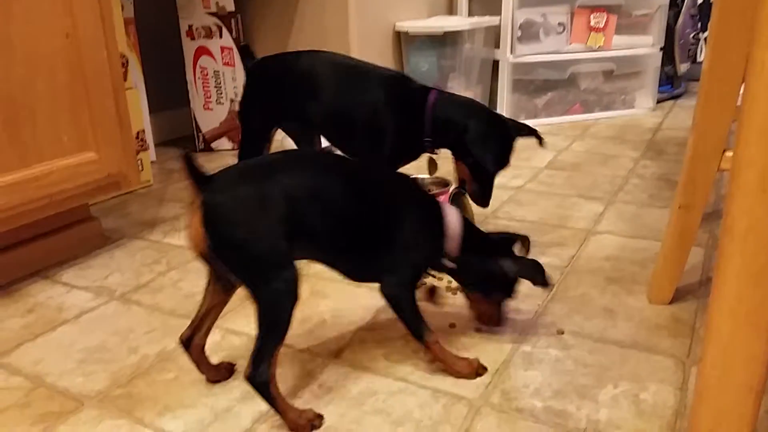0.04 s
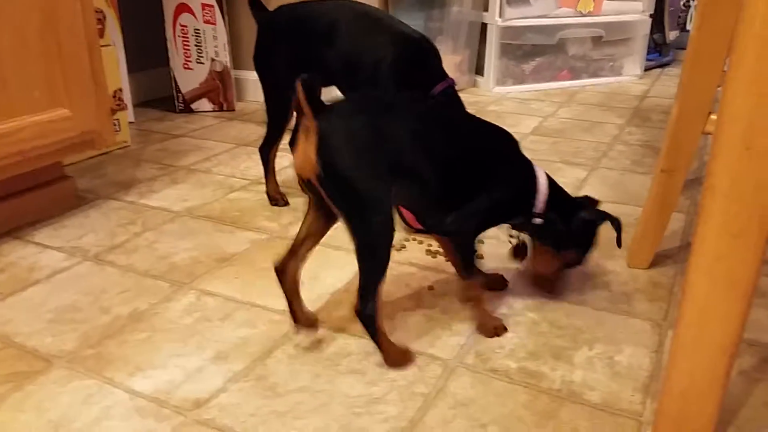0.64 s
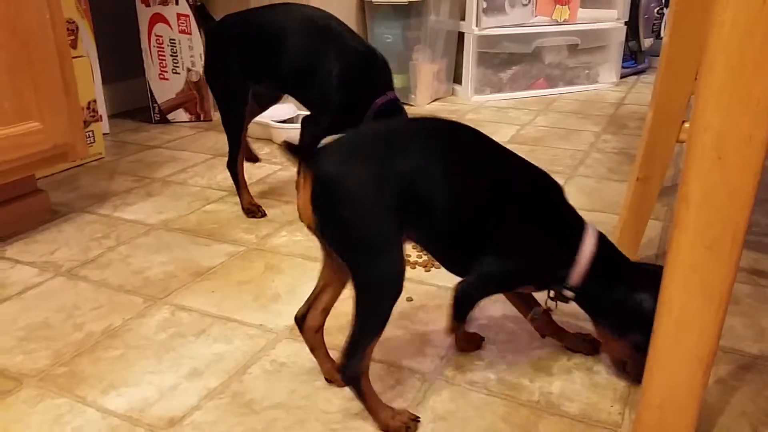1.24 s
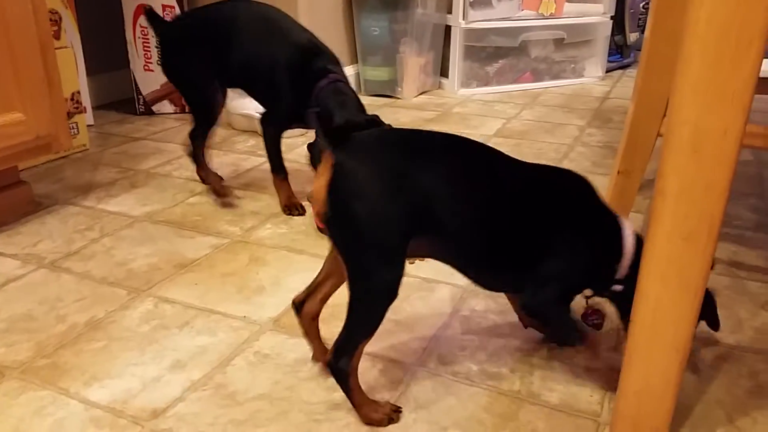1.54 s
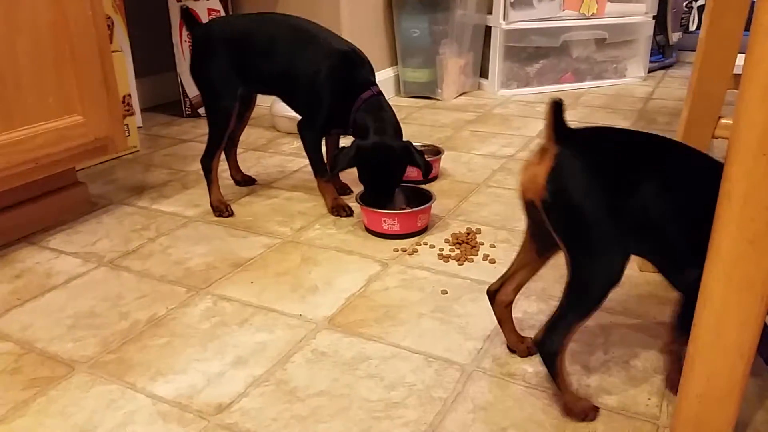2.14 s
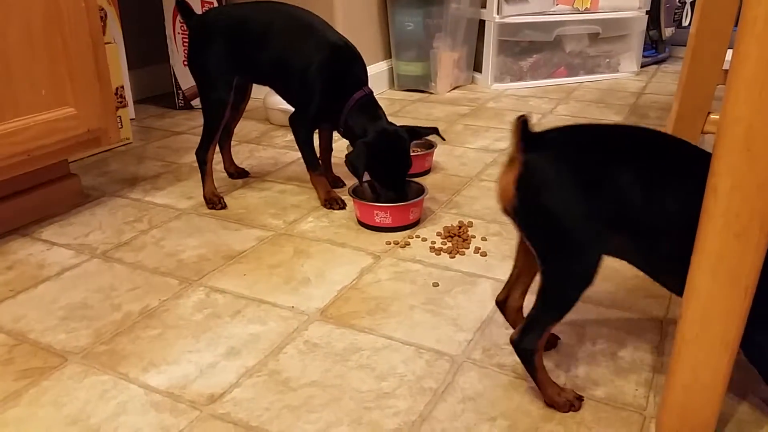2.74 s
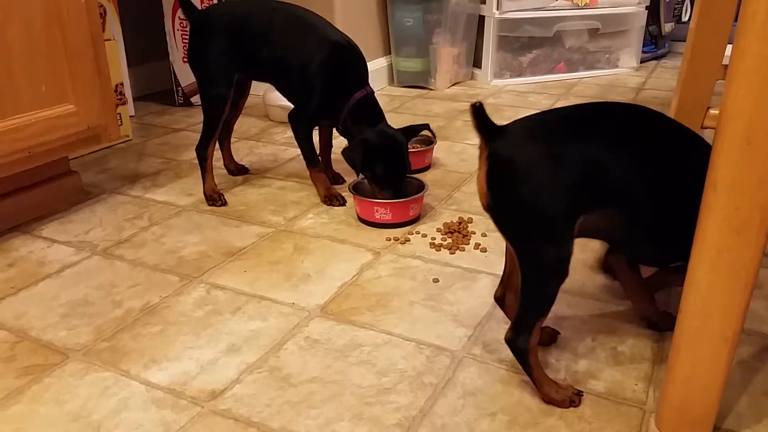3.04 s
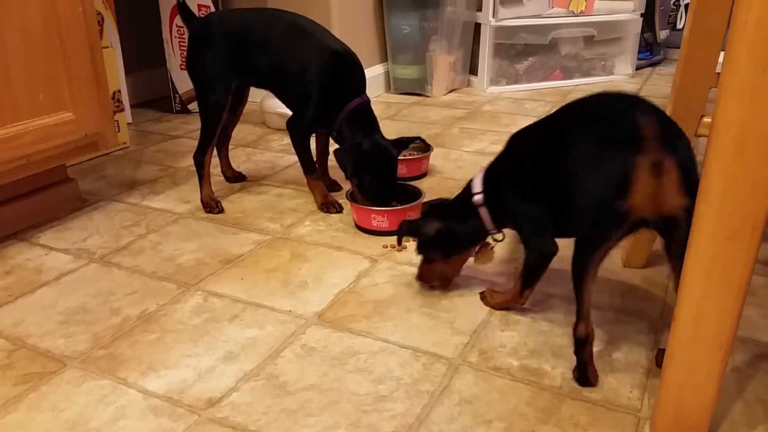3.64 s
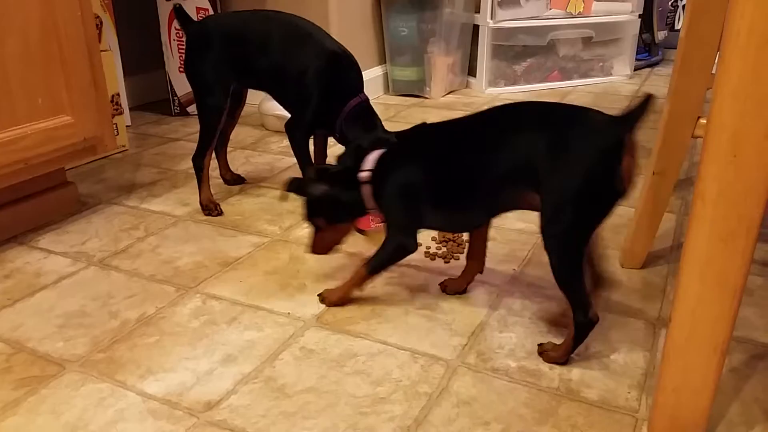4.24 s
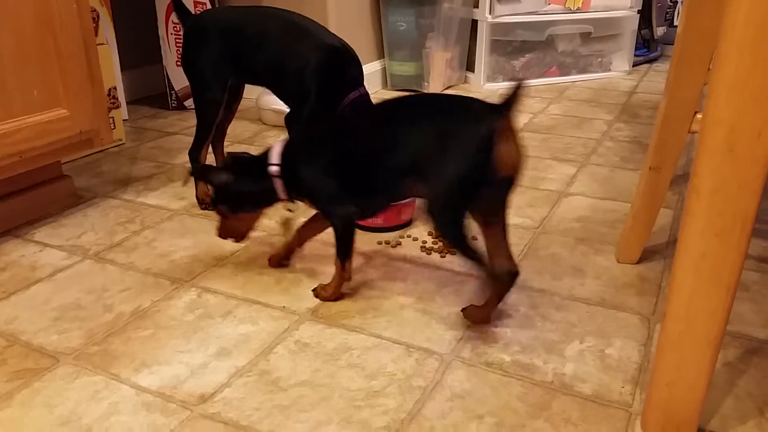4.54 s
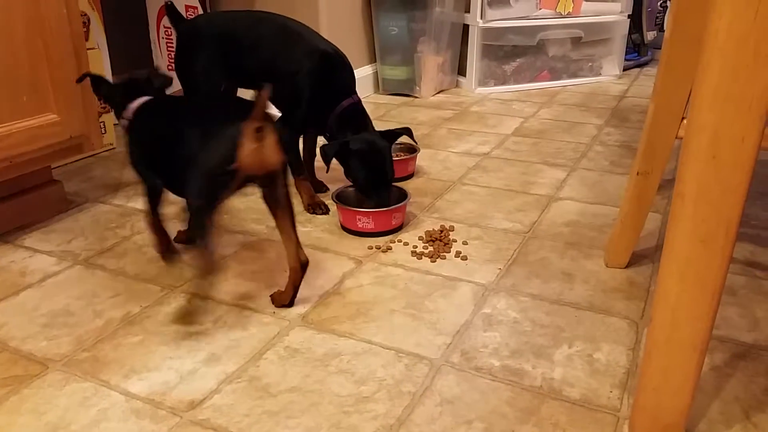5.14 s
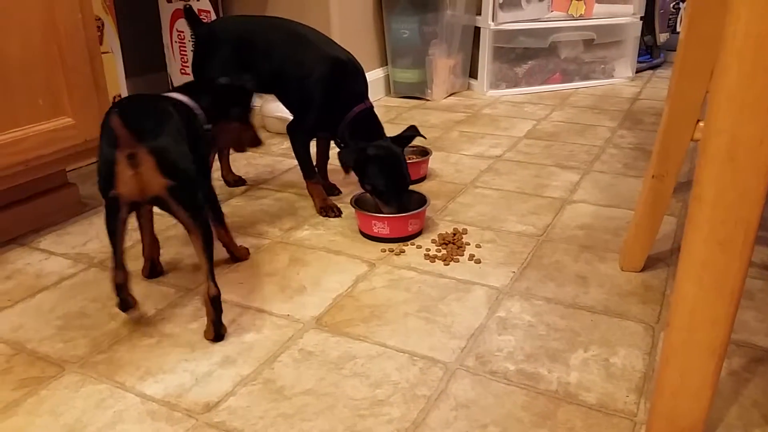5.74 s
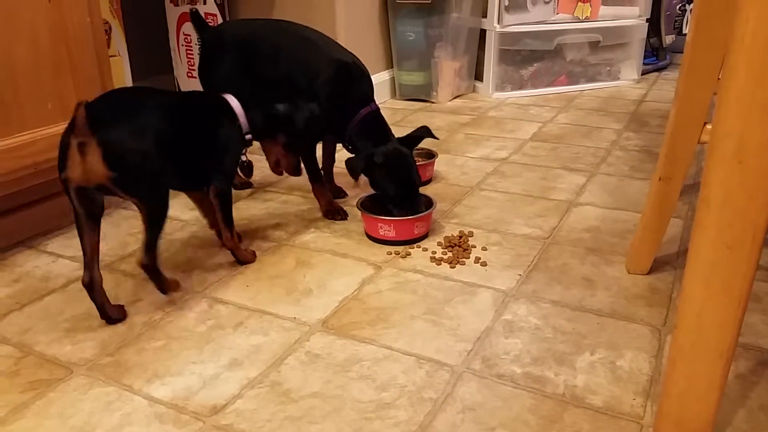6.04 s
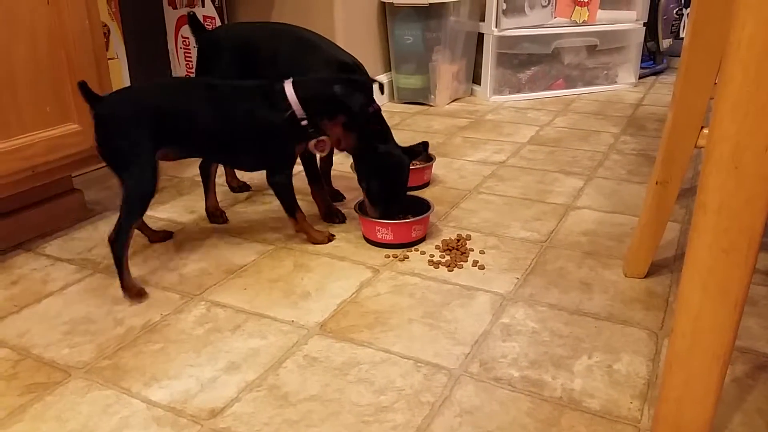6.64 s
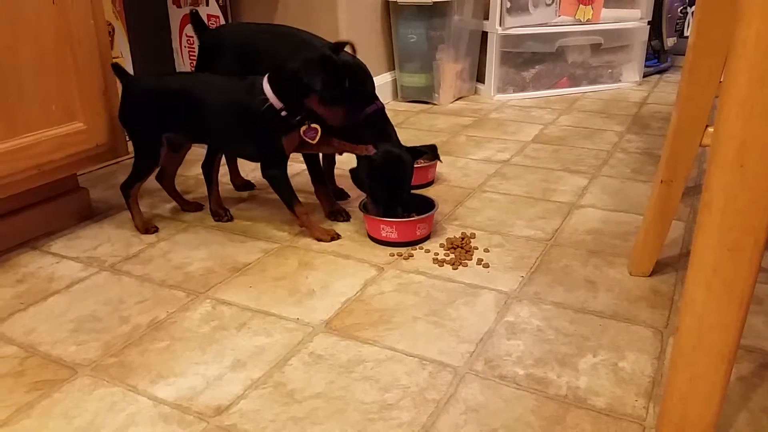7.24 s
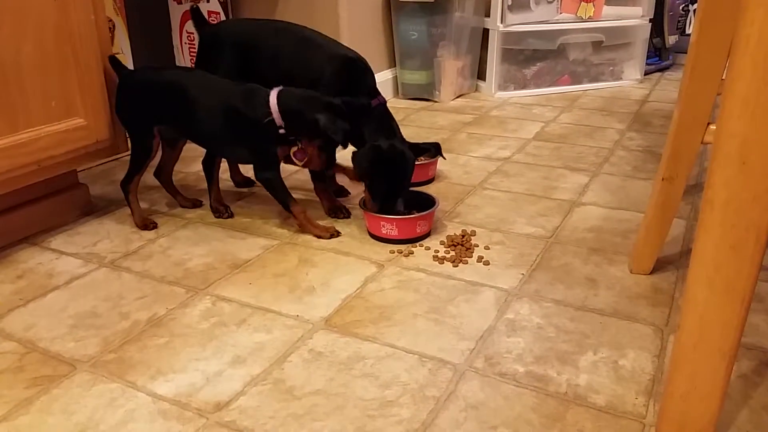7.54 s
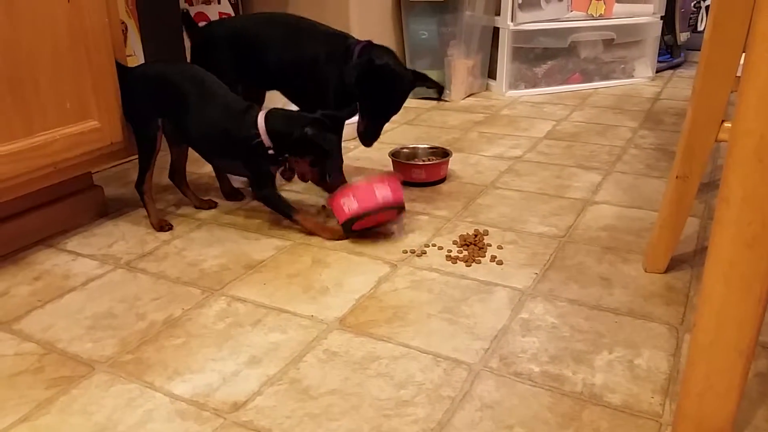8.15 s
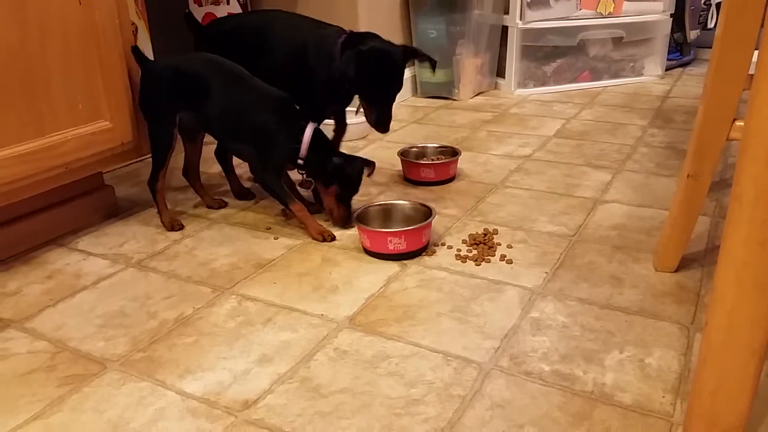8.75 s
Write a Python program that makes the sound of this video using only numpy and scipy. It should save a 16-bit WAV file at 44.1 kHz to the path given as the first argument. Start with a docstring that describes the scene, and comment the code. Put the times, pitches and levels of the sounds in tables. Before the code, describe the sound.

Two dogs crunch kibble with tapping claws and clinking collar tags, then a steel bowl tips and clatters on a kitchen floor.

```python
"""Two dogs eat from steel bowls on a hard kitchen floor while an appliance hums.
From the start kibble cracks between teeth, claws tap, collar tags clink and paws thump.
Near 1.5 s a bowl is knocked and its kibble rattles. From 3 to 7 s jaws crush crumbs,
muzzles rummage and tongues tick. At 8 s a bowl is tipped up and rocks back down:
its base bumps the floor and the kibble surges against the ringing steel."""
import sys
import numpy as np
from scipy import signal
from scipy.fft import rfft, irfft, next_fast_len
from scipy.io import wavfile

SR = 44100
rng = np.random.default_rng(int(sys.argv[2]) if len(sys.argv) > 2 else 0)


def persist_wave(psi):
    """Save psi, clipped to +-1, as 16-bit WAV."""
    counts = np.round(np.clip(psi, -1, 1) * 32767).astype(np.int16)
    wavfile.write(sys.argv[1], SR, np.atleast_2d(counts).T)


N = 396900
FEEDING_FROM_S, FEEDING_TO_S = 3.0, 6.95

# Spectra of a crack: bright snap, hollow body, hard edge. Each row: frequency in Hz, relative dB.
SNAP_SPECTRUM = [(5000, -10), (6500, -11.5), (8000, -15), (10000, 2.5), (11300, 7), (13000, -3),
                 (16000, -17.5)]
BODY_SPECTRUM = [(300, -23.5), (620, 7.5), (850, -7), (1120, 5.5), (1600, -11.5), (2400, -14.5),
                 (4000, -59)]
EDGE_SPECTRUM = [(1500, 9), (2500, -37.5), (3400, 3.5), (4300, 1), (5800, 8.5), (7500, -22.5)]


def from_db(db):
    """Decibels to gain."""
    return 10 ** (np.asarray(db) / 20)


def decay(t, t60_s):
    """Exponential envelope, 60 dB down at t60_s."""
    return from_db(-60 * t / t60_s)


def unit_rms(x):
    """Scale to rms 1."""
    return x / np.sqrt(np.mean(x ** 2) + 1e-20)


def at_hz(points, hz):
    """Interpolate a table on a log-frequency axis."""
    freqs, values = np.transpose(points)
    return np.interp(np.log(np.maximum(hz, 1)), np.log(freqs), values)


def seconds(length_s):
    """Time axis of a short sound."""
    return np.arange(int(length_s * SR)) / SR


def add(out, start_s, sound):
    """Mix a sound in at start_s."""
    start = int(np.clip(round(start_s * SR), 0, N - 1))
    out[start:start + len(sound)] += sound[:N - start]


def colour(x, spectrum, size=4096):
    """Minimum-phase filter that keeps the power of white noise."""
    gain = from_db(at_hz(spectrum, np.fft.rfftfreq(size, 1 / SR)))
    cepstrum = irfft(np.log(gain))
    cepstrum[1:size // 2] *= 2
    cepstrum[size // 2 + 1:] = 0
    response = irfft(np.exp(rfft(cepstrum)))
    return signal.oaconvolve(x, response / np.linalg.norm(response))[:N]


def ring(drive, hz, t60_s):
    """Resonator: a unit click starts a damped sine of height 1."""
    r, w = decay(1 / SR, t60_s), 2 * np.pi * hz / SR
    return signal.lfilter([0, np.sin(w)], [1, -2 * r * np.cos(w), r * r], drive + 1e-18)


def strikes(times_s, levels_db):
    """One click per contact."""
    out = np.zeros(N)
    out[np.clip(np.round(times_s * SR).astype(int), 0, N - 1)] = from_db(levels_db)
    return out


def sprays(times_s, levels_db, t60_s):
    """One dying spray of micro-clicks per contact; the level sets its energy."""
    out, t = np.zeros(N), seconds(0.05)
    for start_s, db in zip(times_s, levels_db):
        spray = rng.laplace(size=len(t)) * decay(t, t60_s)
        add(out, start_s, from_db(db) * spray / np.linalg.norm(spray))
    return out


def grains(per_s, spread_db):
    """Random collisions of uneven size; rms 1."""
    sizes = from_db(spread_db * np.minimum(rng.exponential(1, N), 4))
    signs = rng.choice([-1, 1], N)
    return unit_rms(sizes * signs * (rng.random(N) < per_s / SR))


def diffuse(size):
    """Stereo white noise, alike on both sides only in the bass."""
    # Each row: frequency in Hz, left-right coherence from 0 to 1.
    coherence = [(60, 0.2), (150, 1), (300, 0.1), (650, 0), (1400, 0), (3000, 0.02)]
    mid, side = rfft(rng.standard_normal((2, size)))
    alike = at_hz(coherence, np.fft.rfftfreq(size, 1 / SR))
    return irfft(np.sqrt((1 + alike) / 2) * mid + np.sqrt((1 - alike) / 2) * side * [[1], [-1]], size)


def kitchen(x, tail_db, early_db, early_t60_s, lag_samples=3):
    """Direct sound, quick echoes off the floor and nearby things, then a diffuse tail."""
    t = seconds(0.6)
    tail = unit_rms(diffuse(len(t)) * decay(t, t60_s=0.45) * (1 - np.exp(-t / 0.006)))
    early = unit_rms(diffuse(len(t)) * decay(t, early_t60_s))
    response = (from_db(tail_db) * tail + from_db(early_db) * early) / np.sqrt(len(t))
    response[0, 0] += 1
    response[1, lag_samples] += 1   # the right ear is further away
    return signal.oaconvolve(x[None], response, axes=1)[:, :N]


def air_and_hum(air_db=-55, waver_rad=0.24):
    """Steady room air with a faint hiss, and the tones of an appliance motor."""
    # Each row: frequency in Hz, relative noise density in dB.
    air_spectrum = [(20, 2.5), (45, -5), (75, 1.5), (170, 0.5), (300, -4.5), (560, -7.5), (1000, -16.5),
                    (2400, -25.5), (3600, -23.5), (4200, -14.5), (5200, -17.5), (7600, -49), (11000, -31),
                    (16000, -42)]
    # Each row: frequency in Hz, level in dB.
    motor_tones = [(59.3, -58), (103, -65.5), (166, -72.5), (229, -65), (338, -71), (458.8, -59.5)]
    t, knots_s = np.arange(N) / SR, np.linspace(0, N / SR, 40)
    air = np.array([colour(side, air_spectrum) for side in diffuse(N)])
    hum = np.zeros(N)
    for hz, db in motor_tones:
        waver = np.interp(t, knots_s, rng.normal(0, waver_rad, len(knots_s)))
        hum += np.sqrt(2) * from_db(db) * np.sin(2 * np.pi * (hz * t + rng.random()) + waver)
    return from_db(air_db) * air + hum


def cracks():
    """Kibble cracks and claw taps: brittle snaps with a hollow pop from the mouth or floor."""
    # Each row: start in seconds, then snap, body and edge levels in dB.
    contacts = [(0.0841, -40, -53, -47), (0.6993, -29, -55, -59), (0.9306, -28.5, -60, -46),
                (1.2227, -27, -52, -55), (1.2806, -26, -50, -43.5), (1.3379, -47, -50.5, -64),
                (1.37, -59, -66, -56), (1.6205, -28, -61, -46), (1.75, -42, -51, -42.5),
                (2.5765, -41, -51, -44.5), (2.6678, -35.5, -74, -35), (2.8223, -40, -46.5, -60),
                (2.889, -45, -51, -44.5), (2.979, -53.5, -68, -66), (3.26, -40.5, -48, -45),
                (3.6582, -39.5, -55.5, -55), (3.8972, -47.5, -73, -61), (4.127, -48, -74, -63),
                (4.271, -45.5, -69, -65), (4.5218, -49.5, -49, -66), (4.578, -37.5, -50, -46.5),
                (4.661, -32, -45, -50), (4.7597, -50, -47.5, -62), (5.2829, -43, -56, -69),
                (5.3143, -37, -62, -60), (5.4299, -38.5, -50, -56), (5.569, -39, -48, -57),
                (5.658, -41.5, -49, -48), (5.811, -61, -49.5, -56), (5.863, -46, -62, -64),
                (5.9296, -38, -48, -58), (5.986, -41, -66, -65), (6.011, -36, -70, -65),
                (6.053, -29.5, -66, -44), (6.1413, -32, -71, -63), (6.36, -43.5, -61, -59),
                (6.5876, -45, -62, -60), (6.6472, -47.5, -74, -72), (6.7855, -42.5, -51, -76),
                (6.854, -65, -57, -74), (7.0398, -59, -66, -74), (7.203, -55, -77, -73),
                (7.276, -55, -82.5, -71), (7.4274, -45, -52.5, -51.5), (7.649, -42.5, -62, -48.5),
                (7.859, -53, -69, -66), (7.889, -63, -54, -61), (7.9525, -45, -49, -67)]
    times_s, snap_db, body_db, edge_db = np.transpose(contacts)
    snap = colour(sprays(times_s, snap_db + 16, t60_s=0.011), SNAP_SPECTRUM)
    body = colour(sprays(times_s, body_db + 21, t60_s=0.031), BODY_SPECTRUM)
    edge = colour(sprays(times_s, edge_db + 17, t60_s=0.0048), EDGE_SPECTRUM)
    return kitchen(snap + body + edge, tail_db=5, early_db=6.5, early_t60_s=0.0414)


def collar_tags():
    """Small metal plates tick, then ring; mode mix and tuning shift with how they hang."""
    # Each row: start in seconds, then levels of the middle, top and low modes in dB.
    clinks = [(.2275, -38.5, -51, -68), (0.33, -25, -36, -39), (.3995, -25, -32, -48),
              (.5436, -32.5, -31, -57), (.6377, -39.5, -27, -55), (.7023, -42, -41, -64),
              (0.725, -39, -25, -57), (.805, -17.5, -20, -30.5), (.821, -18, -27, -36.5),
              (.8494, -25, -37, -59), (.9834, -38, -33, -56), (1.027, -36, -48, -60),
              (1.058, -38, -42, -54), (1.180, -39, -34, -62), (1.2242, -19.5, -28, -58),
              (1.2808, -44, -49, -67), (1.436, -37, -38, -66), (3.2595, -46, -51, -64),
              (3.2844, -33.5, -43, -71), (3.3722, -28.5, -30, -50), (3.425, -28, -31, -51),
              (3.472, -32.5, -40, -55), (3.583, -42.5, -52, -66), (3.775, -34, -39, -52),
              (4.912, -50, -57, -70), (5.043, -46, -53, -65), (7.491, -30, -28, -54),
              (7.5074, -34, -42, -56), (7.5547, -28, -52, -65)]
    # Each row: frequency in Hz, level in dB, t60 in seconds.
    plate_modes = [(6434, -4, 0.12), (6560, -2, .035), (9450, -13, 0.2), (9230, -6, 0.1),
                   (11080, -11, 0.058), (10400, -6, 0.078), (10500, -7.5, 0.023), (10780, -1.5, 0.095),
                   (10650, -8, 0.028), (12300, -6, 0.014), (14640, -1.5, 0.03), (15300, -8.5, .05),
                   (15080, -3, 0.091)]
    # Each row: frequency in Hz, relative level in dB.
    tick_spectrum = [(5000, -29.5), (8000, -21), (9500, -2.5), (11200, 6.5), (13000, -3.5), (16000, -4)]
    times_s, tick_db, _, _ = np.transpose(clinks)
    out = colour(sprays(times_s, tick_db + 18, t60_s=0.03), tick_spectrum)
    hz, mode_db, t60_s = np.transpose(plate_modes)[:, :, None]
    t = seconds(0.2)
    attack = 1 - np.exp(-t / 0.00047)
    for start_s, middle_db, top_db, low_db in clinks:
        uneven, detune, phase = rng.standard_normal((3, len(hz), 1))
        strike_db = np.select([hz > 14000, hz < 7000], [top_db - 1, low_db], middle_db - 7)
        envelopes = from_db(strike_db + mode_db + 3.5 * uneven) * decay(t, t60_s)
        modes = envelopes * np.sin(2 * np.pi * (hz * (1 + 0.003 * detune) * t + phase))
        add(out, start_s, modes.sum(axis=0) * attack)
    highpass = signal.butter(4, 5500, "high", fs=SR, output="sos")   # tiny plates radiate no lows
    out = signal.sosfilt(highpass, out)
    return kitchen(out, tail_db=-2.5, early_db=-1, early_t60_s=0.02, lag_samples=10)


def blow(hz, t60_s, scuff_db, scuff_t60_s):
    """One damped resonance with a scuff; a soft contact excites little outside its band."""
    t = seconds(0.5)
    scuff = ring(rng.standard_normal(len(t)) * decay(t, scuff_t60_s), hz, t60_s=6 / hz)
    tone = decay(t, t60_s) * np.sin(2 * np.pi * hz * t)
    width_hz = min(1.3 * hz, 1400)
    band = signal.butter(2, [hz - width_hz / 2, hz + width_hz / 2], "band", fs=SR, output="sos")
    return signal.sosfilt(band, tone + from_db(scuff_db) * scuff / np.linalg.norm(scuff))


def knocks(thump_cycles=2.4, overtone_ratio=1.76):
    """Floor thumps, muzzle and bowl knocks, hard taps and the bowl's base ring damped resonances."""
    # Soft weight lands. Each row: start in seconds, level in dB, pitch in Hz.
    thumps = [(.514, -25, 161), (.555, -25.5, 215), (1.004, -34, 133), (1.167, -34, 84), (1.466, -26, 234),
              (1.577, -23, 131), (2.99, -30, 240), (3.346, -31.5, 212), (7.953, -25.5, 260),
              (8.593, -15.5, 233), (8.697, -20.5, 191)]
    # Each row: start in seconds, level in dB, pitch in Hz, t60 in seconds, relative overtone in dB.
    hollow_knocks = [(1.471, -25, 633, .05, -5), (1.535, -30.5, 670, .031, -3),
                     (1.585, -33.5, 640, 0.093, -5), (4.396, -23, 561, 0.029, -13.5),
                     (6.173, -31.5, 662, 0.031, 2.5), (7.953, -28.5, 808, 0.088, -24),
                     (8.030, -39.5, 823, .06, -8), (8.398, -40.5, 647, .14, -20),
                     (8.595, -19.5, 685, 0.018, -3)]
    # Each row: start in seconds, level in dB, pitch in Hz, t60 in seconds.
    hard_taps = [(0.329, -16, 4050, 0.0036), (2.576, -40, 1423, 0.12), (2.669, -49, 1420, 0.2)]
    # The base hits the floor. Each row: start in seconds, level in dB.
    base_bumps = [(7.950, -33), (8.135, -40), (8.160, -42.5), (8.315, -38.5), (8.397, -41), (8.596, -37),
                  (8.695, -52)]
    # Loaded bowl. Each row: frequency in Hz, level in dB, t60 in seconds.
    base_modes = [(192.6, -9, 0.21), (255, -0.5, 0.056), (305.5, -9.5, 0.23), (351.6, -5, 0.31),
                  (448, -14.5, 0.32), (777, -22, 0.32), (1208, -15.5, 0.15)]
    out = np.zeros(N)
    for start_s, db, hz in thumps:
        add(out, start_s, from_db(db) * blow(hz, thump_cycles / hz, scuff_db=5.5, scuff_t60_s=0.015))
    for start_s, db, hz, t60_s, overtone_db in hollow_knocks:
        fundamental = blow(hz, t60_s, scuff_db=10.5, scuff_t60_s=0.03)
        overtone = blow(hz * overtone_ratio, 0.74 * t60_s, scuff_db=12, scuff_t60_s=0.026)
        add(out, start_s, from_db(db) * (fundamental + from_db(overtone_db) * overtone))
    for start_s, db, hz, t60_s in hard_taps:
        add(out, start_s, from_db(db) * blow(hz, t60_s, scuff_db=11.5, scuff_t60_s=0.02))
    times_s, bump_db = np.transpose(base_bumps)
    for hz, mode_db, t60_s in base_modes:
        out += ring(strikes(times_s, bump_db + mode_db), hz, t60_s)
    return kitchen(out, tail_db=-3, early_db=-6.5, early_t60_s=0.057)


def chewing(rise_s=0.015, hold_s=0.044, rummage_db=-63):
    """Each bite crushes crumbs; the muzzle smacks more dully and rummages between bites."""
    # Each row: start in seconds, crumb level in dB, muzzle level in dB.
    bites = [(.65, -37.5, -48), (0.878, -35, -46.5), (3.09, -59, -54.5), (3.30, -40.5, -48),
             (3.60, -75, -56), (3.83, -58, -74), (4.059, -52.5, -61), (4.24, -55, -53),
             (4.42, -53.5, -55.5), (4.559, -38.5, -47), (4.681, -53, -57), (4.83, -50, -76),
             (4.97, -59, -54), (5.13, -43.5, -52), (5.249, -37.5, -49.5), (5.45, -44, -62),
             (5.57, -45, -55), (5.668, -42, -50), (5.94, -36.5, -47), (6.06, -39, -67), (6.20, -41, -49),
             (6.378, -41.5, -46.5), (6.60, -51, -61), (6.79, -63, -68)]
    t, clock_s = seconds(0.5), np.arange(N) / SR
    jaw = np.minimum(t / rise_s, 1) * decay(np.maximum(t - rise_s - hold_s, 0), t60_s=0.24)
    feeding = (clock_s > FEEDING_FROM_S) & (clock_s < FEEDING_TO_S)
    crumb_power, muzzle_power = np.zeros(N), from_db(rummage_db) ** 2 * feeding
    for start_s, crumb_db, muzzle_db in bites:
        add(crumb_power, start_s, (from_db(crumb_db) * jaw) ** 2)
        add(muzzle_power, start_s, (from_db(muzzle_db) * jaw) ** 2)
    crumbs = from_db(-11) * grains(per_s=660, spread_db=1) * np.sqrt(crumb_power)
    smacks = from_db(-9) * grains(per_s=220, spread_db=3.1) * np.sqrt(muzzle_power)
    crunch = colour(crumbs, SNAP_SPECTRUM) + from_db(-23) * colour(crumbs, EDGE_SPECTRUM)
    return kitchen(crunch + colour(smacks, BODY_SPECTRUM), tail_db=-4, early_db=-7.5, early_t60_s=0.053)


def bowl_rattle(pelt_db=-39):
    """Pellets hit each other and the steel wall, which rings under them and under sharp clanks."""
    # Each row: start in seconds, level in dB, rise and t60 in seconds, relative low rattle in dB.
    surges = [(1.466, -38.5, 0.0029, 0.39, 5.5), (1.535, -33.5, 0.0088, 0.72, -0.5),
              (1.590, -46, .008, 0.29, 7), (8.003, -37.5, 0.017, 0.57, 1.5),
              (8.073, -26.5, 0.014, 0.26, -15), (8.125, -30, 0.0061, 0.23, -7),
              (8.34, -37, .0017, 0.17, -3), (8.399, -42.5, 0.01, 0.72, 8), (8.476, -21.5, 0.025, 0.34, -3),
              (8.541, -24.5, 0.0084, 0.3, -6), (8.594, -18.5, 0.0026, 0.4, -3),
              (8.694, -18.5, 0.0048, 0.35, -0.5), (8.745, -25, .0054, 0.2, -2),
              (8.835, -44, 0.0032, .25, 6.5)]
    # Each row: start in seconds, level in dB.
    clanks = [(8.441, -20.5), (8.463, -28), (8.484, -20.5), (8.544, -17.5), (8.597, -16), (8.696, -16.5),
              (8.718, -13.5), (8.746, -27)]
    # Rattle spectra and wall modes. Each row: frequency in Hz, relative level in dB.
    high_spectrum = [(1200, -25), (2300, -8.5), (3200, 1), (4200, -1.5), (5000, -4.5), (6000, -1),
                     (6900, -5.5), (7600, -8), (9000, -1), (10200, 0), (11200, 11), (12500, 7), (14000, -5),
                     (16000, -32)]
    low_spectrum = [(120, -11), (250, -2.5), (480, -4), (700, 5.5), (950, 2), (1250, 5.5), (1700, -0.5),
                    (2600, -11.5), (5000, -80)]
    wall_modes = [(3040, -9.5), (3350, -4.5), (4010, -9), (4960, -3), (5310, -10.5), (5850, -28),
                  (6030, -3.5), (7210, -7.5), (7570, -5), (7920, -2.5), (8430, -5.5), (8930, -2),
                  (9765, 6.5), (10100, 6.5), (10390, 1.5), (10612, 3), (10820, -13), (11120, 9), (11186, 5),
                  (11890, -6), (12075, -4), (12228, 3.5), (12703, -5), (13500, -41), (14318, 2),
                  (14830, -6)]
    high_power, low_power, t = np.zeros(N), np.zeros(N), seconds(0.6)
    for start_s, db, rise_s, t60_s, low_db in surges:
        fall = from_db(db) * decay(np.maximum(t - rise_s, 0), t60_s)
        power = np.minimum(t / rise_s, 1) * fall ** 2
        add(high_power, start_s, power)
        add(low_power, start_s, power * from_db(low_db) ** 2)
    pellets = grains(per_s=4200, spread_db=5.5)
    pelting = pellets * np.sqrt(high_power)
    out = from_db(-8) * colour(pelting, high_spectrum)
    out += from_db(-13.5) * colour(pellets * np.sqrt(low_power), low_spectrum)
    times_s, clank_db = np.transpose(clanks)
    coupling = rng.standard_normal(N)   # differs for each pellet and mode
    for k, (hz, mode_db) in enumerate(wall_modes):
        hits = strikes(times_s, clank_db + rng.normal(-14, 3.2, len(times_s))) * (-1) ** k
        drive = hits + from_db(pelt_db) * pelting * np.roll(coupling, k)
        out += from_db(mode_db) * ring(drive, hz, t60_s=0.045)   # the kibble damps the wall
    return kitchen(out, tail_db=-1, early_db=2, early_t60_s=0.044)


def licks(per_s=15):
    """Dull, irregular ticks of tongues, lips and nudged pellets."""
    count = int(per_s * (FEEDING_TO_S - FEEDING_FROM_S))
    jitter_s = rng.uniform(-0.46, 0.5, count) / per_s
    times_s = np.linspace(FEEDING_FROM_S, FEEDING_TO_S, count) + jitter_s
    ticks = sprays(times_s, levels_db=rng.normal(-39.5, 3.5, count), t60_s=0.013)
    return kitchen(colour(ticks, BODY_SPECTRUM), tail_db=-3, early_db=3, early_t60_s=0.037)


def scene():
    """Stereo sum of everything in the kitchen."""
    return air_and_hum() + cracks() + collar_tags() + knocks() + chewing() + bowl_rattle() + licks()


def record(dry):
    """The two microphone ports differ in colour; treble above 16 kHz is cut."""
    # Each row: frequency in Hz, left minus right in dB.
    balance = [(60, 0), (200, -1), (600, 1), (1400, 0), (2600, 0), (4400, 16), (6000, 9.5), (8000, 4.5),
               (10000, -6.5), (15000, 0)]
    size = next_fast_len(N + SR)
    lean_db = at_hz(balance, np.fft.rfftfreq(size, 1 / SR)) / 2
    heard = irfft(rfft(dry, size) * from_db([lean_db, -lean_db]), size)[:, :N]
    lowpass = signal.ellip(10, 0.3, 80, 16000, fs=SR, output="sos")
    return signal.sosfilt(lowpass, heard)


dry = scene()
out = record(dry)
persist_wave(out)
```